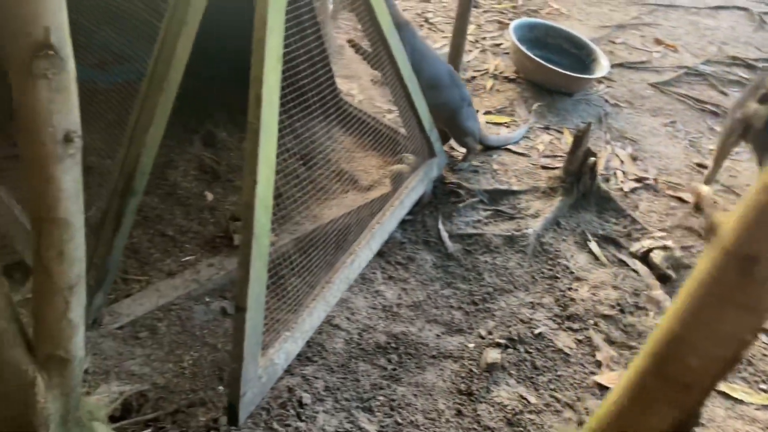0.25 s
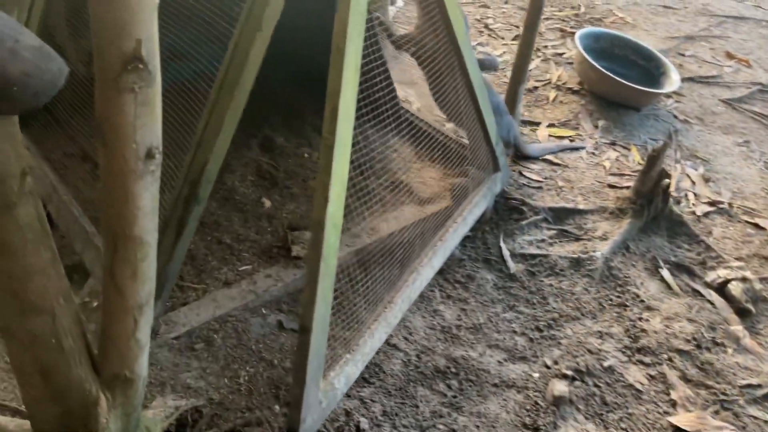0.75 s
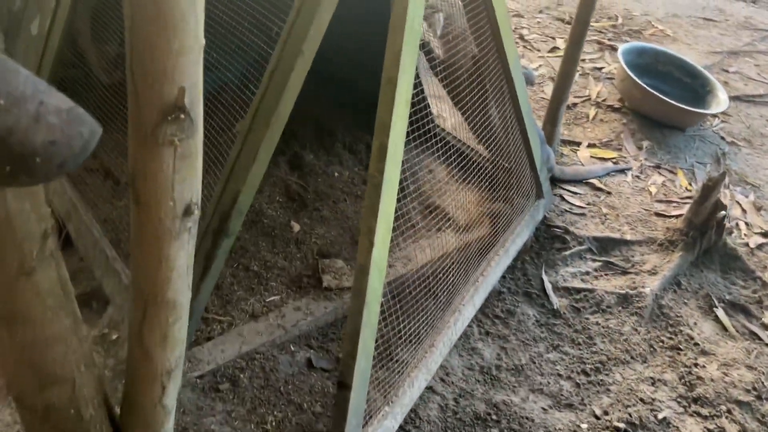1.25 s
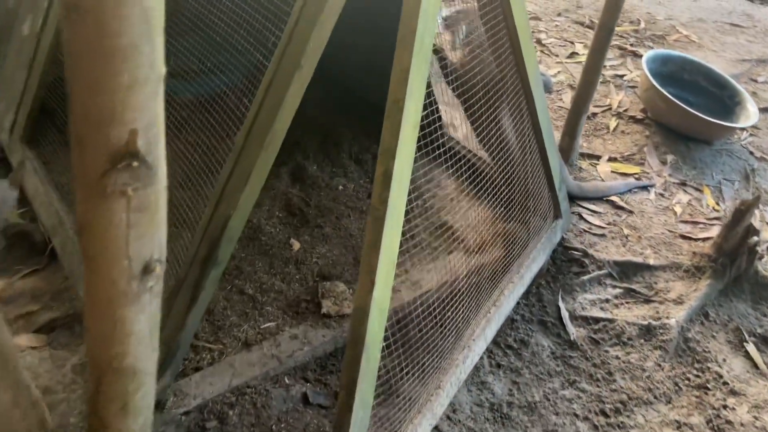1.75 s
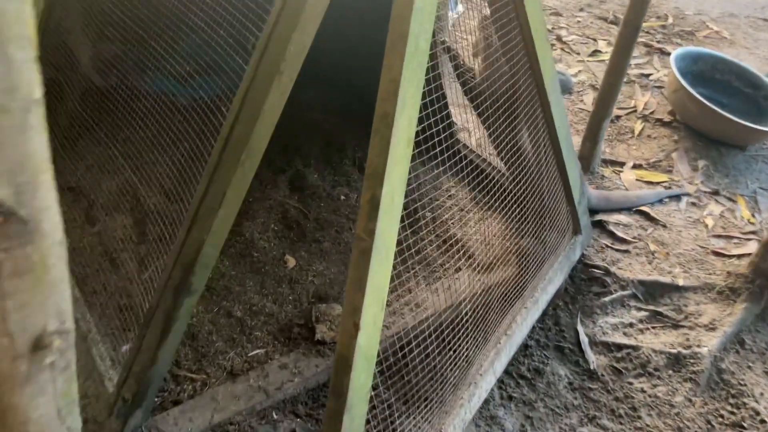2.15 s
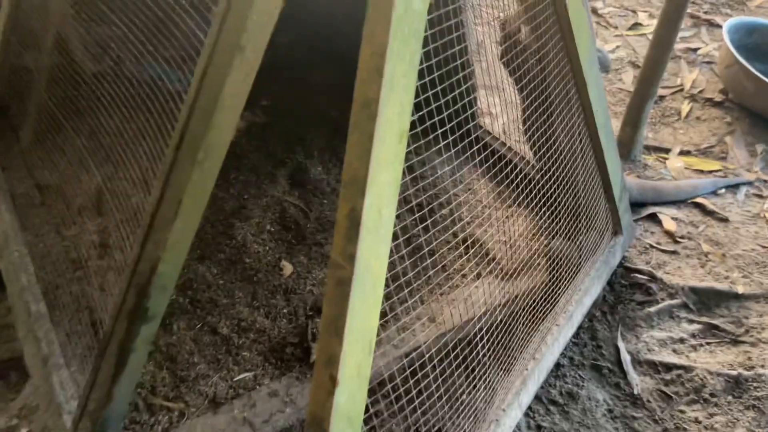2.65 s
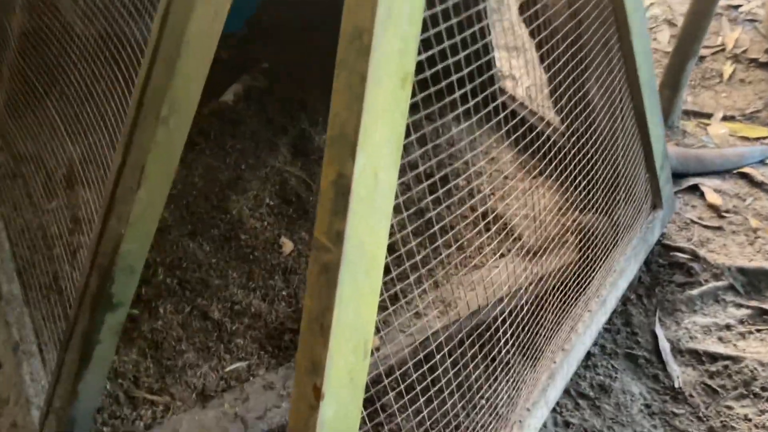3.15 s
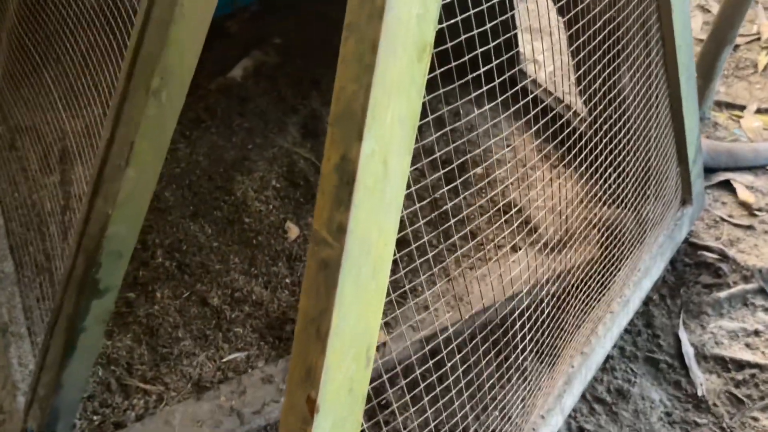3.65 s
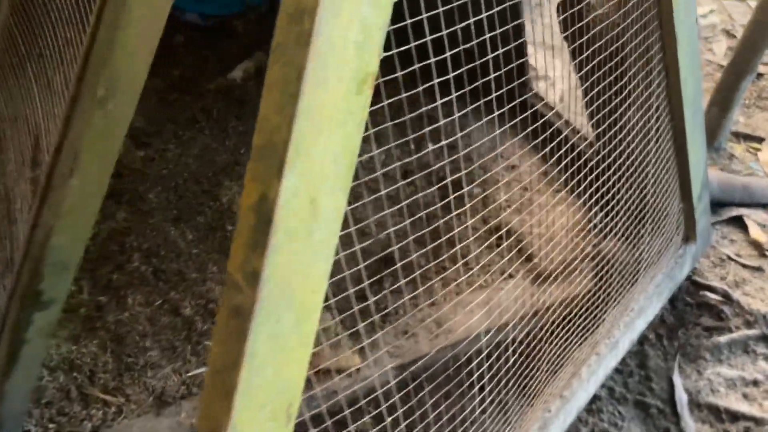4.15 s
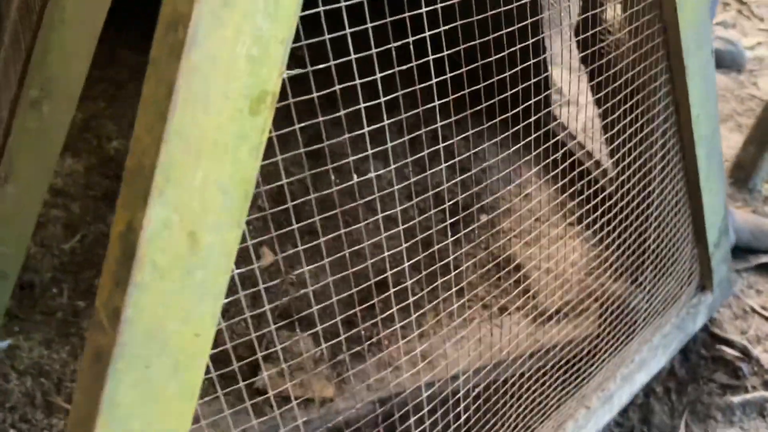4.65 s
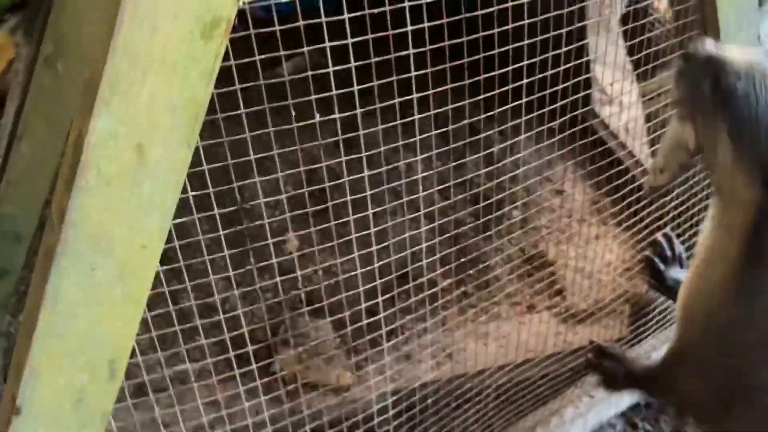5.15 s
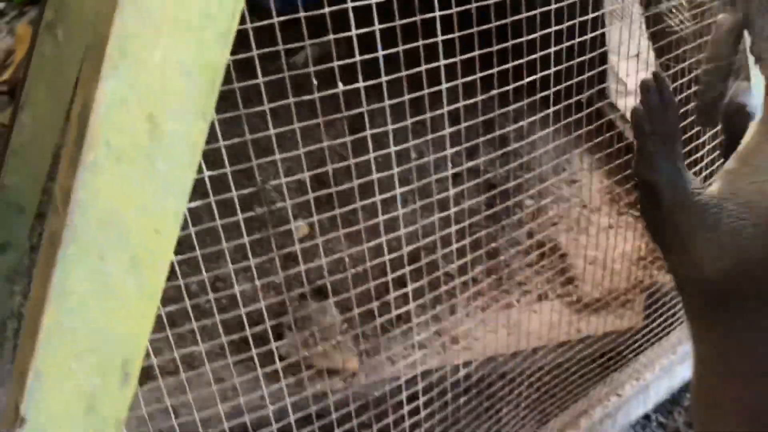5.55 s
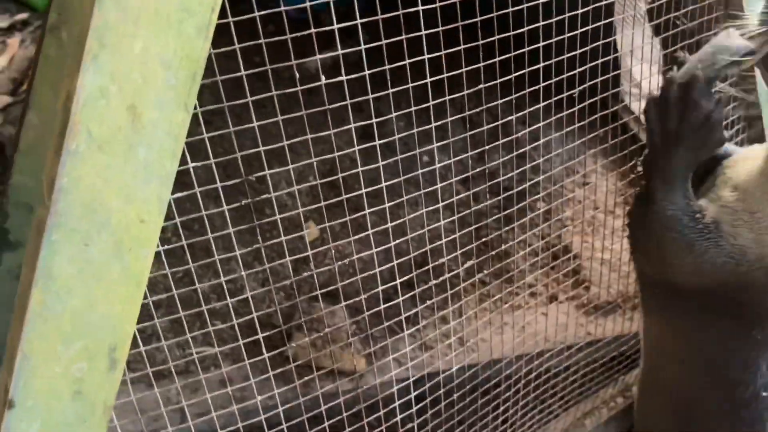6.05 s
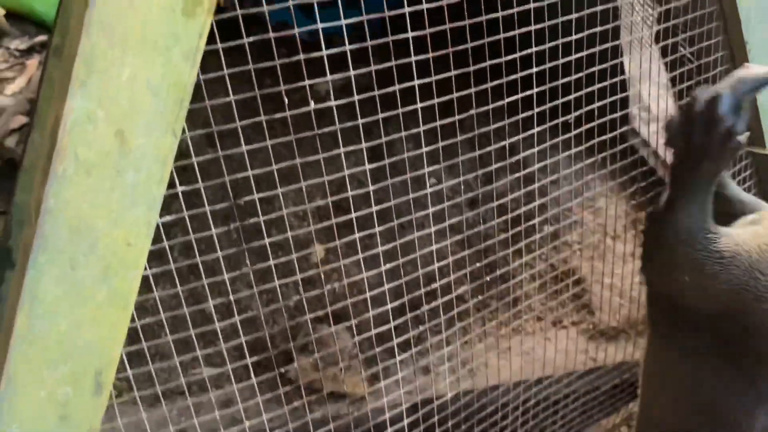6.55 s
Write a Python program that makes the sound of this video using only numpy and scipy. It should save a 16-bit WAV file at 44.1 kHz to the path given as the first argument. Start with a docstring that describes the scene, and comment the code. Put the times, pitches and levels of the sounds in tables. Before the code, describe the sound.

Close outdoor stereo at a wire pen, with short scattered echoes, soft low rumble, thin hiss and faint high insect pips throughout. From 0 to 1.1 s a nearby otter makes a breathy, rasping low call, gradually rising and clearing. It leaps into a bright squeak at 1.15 s, then short chirps at 1.4, 1.6 and 2.0 s, each flicking and dipping. A thin, steady whine from a second otter sits further left, about 1.8 to 2.7 s. At 2.3 s a chirp breaks into a hoarse warbling wail until 3.35 s. A brief squeak at 3.5 s leads to a longer, clearer squeal, 3.7 to 4.2 s, with light mesh ticks near 4.0 and 4.15 s. A rough call follows at 4.3 s, then squeaks at 4.8 and 5.1 s. Rumble swells around 5.25 s with another tick. A long falling, rasping squeal runs 5.5 to 6.5 s; a tick and short chirp end it near 6.7 s.

```python
"""A nearby otter chirps, squeaks and squeals beside a wire pen: a stack of partials and puffs of breath,
both shaped by throat and mouth, clear when high and rasping when low. A second otter whines further off
on three sine partials. Paws tick on the mesh as fading tones with noisy rattle, and an insect pips on
one pitch. Shaped noise makes a low rumble and a thin outdoor hiss, and noise echoes make the surroundings."""
import sys
import numpy as np
from scipy import signal
from scipy.fft import rfft, irfft
from scipy.io import wavfile
from scipy.ndimage import uniform_filter1d, map_coordinates

SR = 44100
rng = np.random.default_rng(int(sys.argv[2]) if len(sys.argv) > 2 else 0)


def store_wav(level_fs):
    """Save 16-bit WAV to argv[1]."""
    pcm = np.round(np.clip(np.atleast_2d(level_fs), -1, 1) * 32767)
    wavfile.write(sys.argv[1], SR, pcm.T.astype(np.int16))


def boost(x):
    """Linear amplitude factor 10**(x/20) for a level x in decibels (scalar or array-like)."""
    u = np.asarray(x, float) / 20
    return 10 ** u


N = 299880
T = np.arange(N) / SR   # time of each sample in s
HZ = np.arange(N // 2 + 1) * SR / N + 1e-3   # spectrum frequencies, just above 0 so that log works


def rms_one(x):
    """Scales a sound to an rms of 1."""
    return x / np.sqrt(np.mean(x ** 2) + 1e-20)


def at_hz(points, hz):
    """Reads a curve of (f/Hz, level/dB) along a logarithmic frequency axis."""
    table_hz, table_db = np.transpose(points)
    return np.interp(np.log(hz), np.log(table_hz), table_db)


def over_time(points):
    """Draws straight lines through (t/s, value) points, one value per sample."""
    return np.interp(T, *np.transpose(points))


def colour(x, gain):
    """Filters a sound by multiplying its spectrum by a gain."""
    return irfft(rfft(x) * gain, N)


def drift(rate_hz):
    """Slow chance: noise through a double one-pole low-pass, spread 1."""
    r = np.exp(-2 * np.pi * rate_hz / SR)
    noise = rng.standard_normal(N + SR)
    settled = signal.lfilter([1], [1, -2 * r, r * r], noise)[SR:]   # drop the filter's first second
    return rms_one(settled)


def joined(tables, column):
    """Joins the tables of several calls and draws lines through one column."""
    rows = np.concatenate(tables)
    return np.interp(T, rows[:, 0], rows[:, column])


def gate(tables, rise_s, fall_s):
    """1 while a call sounds, 0 outside, ramped at both ends."""
    total = 0
    for rows in tables:
        rise = (T - rows[0][0]) / rise_s
        fall = (rows[-1][0] - T) / fall_s
        total = total + np.clip(np.minimum(rise, fall), 0, 1)
    return total


def background(alike_hz=450, hiss_db=-46.5):
    """Rumble is shaped noise, more alike on both sides the lower it is; hiss is unrelated between sides."""
    # spectrum shape of the outdoor hiss: f/Hz, relative level/dB per Hz
    hiss_shape = [(180, -44), (300, 0), (1440, -2), (2200, 1), (3500, -11), (4700, 2), (6400, 1.5),
                  (7200, -5.5), (8800, -9), (10700, -6), (11700, -6), (13300, -74)]
    # spectrum shape of the rumble: f/Hz, relative level/dB per Hz
    rumble_shape = [(25, -17), (50, 6), (105, 5), (200, -6), (400, -19), (800, -69.5)]
    # loudness of the rumble, midway between the two sides: t/s, level/dB
    rumble_level = [(0.0, -44.5), (5.1, -46), (5.25, -37), (5.75, -39.5), (6.1, -45.5), (6.35, -40),
                    (6.55, -47.5)]
    common, own = rng.standard_normal(N), rng.standard_normal((2, N))
    alike = 1 / (1 + (HZ / alike_hz) ** 2)   # shared part of the power
    low = boost(at_hz(rumble_shape, HZ))
    rumble = rms_one(colour(common, low * np.sqrt(alike)) + colour(own, low * np.sqrt(1 - alike)))
    hiss = rms_one(colour(rng.standard_normal((2, N)), boost(at_hz(hiss_shape, HZ))))
    rumble_db = over_time(rumble_level) + [[.6], [-.6]]   # a little louder on the left
    return rumble * boost(rumble_db) + hiss * boost(hiss_db)


def surroundings(x, early_s, late_db, late_s):
    """Scatter from posts, mesh and ground: a dense early cluster and a fainter tail, other ones per side."""
    age = T[:SR // 2]
    shape = np.exp(-age / early_s) + boost(late_db) * np.exp(-age / late_s)
    echoes = rng.standard_normal((2, len(age))) * shape / np.sqrt(np.sum(shape ** 2))
    return signal.fftconvolve(x[None], echoes, axes=1)[:, :N]


def insect(pip_hz=6500, pip_db=-53, pips_per_s=12, peak_s=.003):
    """Short swelling and fading pips of one pitch that come in loose groups."""
    # twice the average rate, but only in the half of the time when the drift is positive
    begins = (rng.random(N) < 2 * pips_per_s / SR) * (drift(3.0) > 0)
    starts = begins * boost(2 * rng.standard_normal(N))   # strength varies from pip to pip
    age = T[:SR // 40]
    swell = age / peak_s * np.exp(1 - age / peak_s)
    pips = signal.fftconvolve(starts, swell)[:N]
    return boost(pip_db) * pips * np.sin(2 * np.pi * pip_hz * T)


def ticks(cycles=22.0, rattle_db=-9, rattle_s=0.0019):
    """Each touch rings the struck part briefly and shakes a burst of rattle from the mesh."""
    # paws on mesh and frame: t/s, starting level of the ring before the mix/dB, f of the ring/Hz
    touches = [(2.692, -25, 134.3), (4.039, -12, 2353), (4.147, -19, 2420), (5.28, -17, 2330),
               (6.659, -22, 1513)]
    out, mesh = np.zeros(N), rng.standard_normal(N)
    for s, db, hz in touches:
        age = np.maximum(T - s, 0)
        body = np.sin(2 * np.pi * hz * age) * boost(-60 * age * hz / cycles)   # down 60 dB after 22 cycles
        rattle = boost(rattle_db) * mesh * np.exp(-age / rattle_s) * min(hz / 1500, 1)
        out += boost(db) * (T >= s) * (body + rattle)
    return out


def far_otter():
    """A thin, nearly steady whine of three partials."""
    # one table per whine: t/s, middle pitch f/Hz, level before flutter and mix/dB
    whines = [
        [(1.82, 820, -53.5), (2.02, 818, -56.5)],
        [(2.03, 904, -59), (2.4, 858, -47.5), (2.7, 840, -100)],
    ]
    # lowest partial first: level/dB
    partials_db = [2, -3, -15]
    pitch = joined(whines, 1) * np.exp(0.011 * drift(62.0))
    phase = 2 * np.pi * np.cumsum(pitch) / SR
    tone = sum(boost(db) * np.sin((k + 1) * phase) for k, db in enumerate(partials_db))
    level = boost(joined(whines, 2) + 3 * drift(28))
    return tone * level * gate(whines, rise_s=0.027, fall_s=0.011)


def calls(flick_peak_s=0.027, flick_swell_db=4.5, flick_longest_s=.09):
    """Each call's table, headed by its flick: to the peak pitch while swelling, then on into the call."""
    # opening flicks: start t/s, start f/Hz, peak f/Hz, level below 4 kHz/dB, level above 4 kHz/dB;
    # both levels belong to the peak and come before flutter and mix
    flicks = [(1.153, 1577, 2053, -16, -30.5), (1.381, 1483, 1580, -26, -30),
              (1.628, 1290, 1331, -30, -30.5), (1.965, 1565, 1770, -28, -29.5),
              (2.273, 1267, 1241, -24.5, -32.5), (3.457, 1416, 1727, -28.5, -32.5),
              (3.673, 1514, 1807, -30, -26.5), (4.282, 1288, 1305, -34, -34.5),
              (4.811, 1234, 1453, -30, -31), (5.115, 1345, 1530, -29, -22.5),
              (5.485, 1442, 1550, -31, -28.5), (6.711, 1353, 1351, -31.5, -33)]
    # what follows, one table per call: t/s, middle pitch f/Hz, then the same two levels/dB
    bodies = [
        [(.025, 541, -31, -44), (.058, 524, -57, -49), (.082, 540, -41, -45), (.108, 521, -42, -37.5),
         (.135, 542, -44, -42), (.25, 557.2, -33.5, -40.5), (.5, 567.3, -29.5, -31.5), (.8, 591.7, -32, -28.5),
         (.92, 621.6, -30.5, -27.5), (1.015, 641.5, -27, -27), (1.066, 787, -32.5, -31)],
        [(1.217, 1340, -54, -38), (1.25, 1398, -27.5, -32.5), (1.295, 1029, -68, -45)],
        [(1.437, 1133, -46, -40.5), (1.47, 1216, -31.5, -29), (1.501, 1101, -31, -40)],
        [(1.692, 911, -30.5, -36), (1.724, 1202, -23.5, -29.5), (1.752, 1020, -40, -38),
         (1.78, 1192, -27, -30.5), (1.82, 1050, -31.5, -42), (1.866, 1272, -37, -34)],
        [(2.019, 1170, -38, -33.5), (2.058, 1325, -26, -21.5), (2.092, 1127, -35, -36.5),
         (2.127, 1260, -23, -23)],
        [(2.325, 1007, -24, -31), (2.375, 1270, -45, -36.5), (2.403, 1096, -30, -34), (2.45, 1170, -30.5, -34),
         (2.48, 1005, -29, -37), (2.484, 731, -37, -30), (2.6, 648.4, -32, -34), (2.85, 565.6, -33.5, -31),
         (3.07, 628, -29.5, -30), (3.095, 721, -31.5, -28.5), (3.356, 792.6, -34.5, -29)],
        [(3.516, 1303, -31, -29.5), (3.54, 1278, -40, -67)],
        [(3.732, 1210, -43, -41), (3.773, 1318, -33, -29), (3.835, 1098, -31.5, -34), (4.18, 1038, -31, -40)],
        [(4.334, 943, -33, -38), (4.382, 704, -34.5, -35.5), (4.46, 725, -31, -33), (4.65, 748.6, -31.5, -32),
         (4.691, 841, -34, -33)],
        [(4.873, 1140, -36.5, -32), (4.899, 1247, -24, -23), (4.933, 1038, -31, -33.5),
         (4.993, 1214, -28, -26.5)],
        [(5.168, 1041, -35, -40), (5.19, 1073, -29.5, -35), (5.23, 962, -32.5, -31.5),
         (5.292, 1163, -27.5, -51)],
        [(5.541, 1148, -32, -34), (5.7, 1102, -31.5, -35), (5.81, 862, -35, -31.5), (5.933, 646.7, -38, -37.5),
         (6.08, 694.4, -35.5, -35), (6.256, 776, -32, -28), (6.3, 732, -33, -35), (6.519, 793.6, -26.5, -27.5)],
        [(6.767, 950, -29.5, -43), (6.797, 884, -31, -34)],
    ]
    out = []
    for rows in bodies:
        head = []
        for s, hz, peak_hz, low_db, high_db in flicks:
            if 0 < rows[0][0] - s < flick_longest_s:   # this flick leads into this call
                head.append((s, hz, low_db - flick_swell_db, high_db - flick_swell_db))
                head.append((s + flick_peak_s, peak_hz, low_db, high_db))
        out.append(head + rows)
    return out


def unsteady_pitch(sung, rough, waver=.012, jitter=0.026, warble_hz=19):
    """The folds waver slowly, warble unevenly in the rasping calls and jitter when rough."""
    # largest warble: t/s, swing as natural log of the pitch ratio (+ jumps up, - dips down)
    warble_swing = [(.9, -.07), (1.0, 0), (2.5, 0), (2.6, .22), (3.05, .14), (3.1, 0), (4.35, 0),
                    (4.4, -.25), (4.66, -.25), (4.7, 0), (6.25, 0), (6.26, -.27), (6.45, -.27), (6.47, 0)]
    aim = uniform_filter1d(joined(sung, 1), size=220)
    beat = np.sin(2 * np.pi * np.cumsum(warble_hz * np.exp(.4 * drift(8))) / SR)
    warble_depth = np.minimum(np.abs(drift(10)) + .5, 1)
    warble = over_time(warble_swing) * (1 + beat) / 2 * warble_depth
    return aim * np.exp(waver * drift(14) + warble + rough * jitter * drift(243.0))


def clear_voice(pitch, phase, rough, split_hz, flicker_db=4, halving=1.8):
    """Partials through the throat, below and above the split; roughness weakens every second cycle."""
    # throat and mouth on the partials: f/Hz, relative level/dB
    throat = [(500, -3.5), (800, 12.5), (1100, -2.5), (1650, 11), (2150, 19.5), (2650, -1), (3050, -1.5),
              (3600, -8.5), (4300, -4.5), (5200, 5.5), (6000, 11.5), (7600, -8), (10600, -6.5),
              (13300, -23)]
    # lowest partial against the rest: t/s, added level/dB
    lowest_level = [(1.6, -8), (3.7, -17.5), (3.9, 11), (4.3, -9), (5.9, -7.5), (6.2, 2), (6.7, -14)]
    smooth_pitch = uniform_filter1d(pitch, size=200)
    tone, power = np.zeros((2, N)), np.full((2, N), 1e-9)
    lowest = boost(over_time(lowest_level))
    for k in range(1, 25):
        hz = k * smooth_pitch
        height = boost(at_hz(throat, hz) + flicker_db * drift(21.9)) * (hz < 13300)
        if k == 1:
            height = height * lowest
        upper = np.clip((hz - split_hz) / 400 + .5, 0, 1)
        share = np.sqrt([1 - upper, upper])
        tone += share * height * np.sin(k * phase + k * k)
        power += (share * height) ** 2 / 2
    now_and_then = np.maximum(drift(28), 0)
    depth = np.clip(halving * np.maximum(rough - .3, 0) * now_and_then, 0, 1)
    return tone * (1 + depth * np.cos(phase / 2)) / np.sqrt(power)


def breath(phase, rough, split_hz, pulsing=0.15, sizzle_hz=7500, sizzle_db=18):
    """Noise puffed once a cycle through the mouth, below and above the split."""
    # mouth on the rasp: f/Hz, relative level/dB
    mouth = [(500, -11), (1600, -19), (2100, -3), (2600, 1), (3300, -6.5), (4500, 4), (8000, 10.5),
             (9400, -1), (10500, 13.5), (13300, -20.5)]
    puffs = rng.standard_normal(N) * (1 + pulsing * np.cos(phase))
    shape = boost(at_hz(mouth, HZ))
    low = rms_one(colour(puffs, shape * (HZ < split_hz)))
    high = rms_one(colour(puffs, shape * (HZ >= split_hz)))
    sizzle = colour(high, HZ > sizzle_hz)   # the top of the breath grows with roughness, up to a limit
    high = high + sizzle * (boost(sizzle_db * np.minimum(rough - .42, .15)) - 1)
    return np.array([low, high])


def near_otter(split_hz=4000, low_rasp=0.38, high_rasp=1.87, flutter_db=3.5):
    """Vibrating folds give partials and puffs of breath; the rougher they run, the more breath is heard."""
    # how unsteadily the folds run: t/s, roughness (0 to 1)
    roughness = [(.15, 1), (.25, .5), (.8, .45), (.95, .3), (1.1, .18), (2.31, .2), (2.36, .6), (3.0, .55),
                 (3.16, .2), (4.2, .12), (4.38, .6), (4.7, .55), (4.8, .17), (5.8, .24), (5.86, .65),
                 (6.02, .35), (6.25, .28), (6.3, .45), (6.48, .3)]
    sung = calls()
    rough = np.clip(over_time(roughness), 0, 1)
    pitch = unsteady_pitch(sung, rough)
    phase = 2 * np.pi * np.cumsum(pitch) / SR
    tone = clear_voice(pitch, phase, rough, split_hz)
    rasp = breath(phase, rough, split_hz)
    noisy = np.clip(rough * [[low_rasp], [high_rasp]], 0, 1)
    voice = np.sqrt(1 - noisy ** 2) * tone + noisy * rasp
    level_db = np.array([joined(sung, 2), joined(sung, 3)])
    level = boost(level_db + flutter_db * rough * drift(74))
    return (voice * level).sum(axis=0) * gate(sung, rise_s=0.01, fall_s=0.009)


def right_side(near, sway_s=.00003):
    """Near sounds reach the right microphone later and changed in tone; the path wavers as the head turns."""
    # right microphone against left: f/Hz, level/dB
    shadow = [(300, -5), (700, -33), (1200, -21.5), (2300, 6.5), (3200, 0.5), (5300, -4), (8000, -1)]
    # extra path to the right as the otter moves, before the sway: t/s, delay/s
    lag = [(0, 0.0002), (6.8, 0.00026)]
    heard_at = T - over_time(lag) - sway_s * drift(1.83)
    lagged = map_coordinates(near, [heard_at * SR], order=3)
    return colour(lagged, boost(at_hz(shadow, HZ)))


def scene():
    """Mixes both otters, paws, insect, echoes and background for the left and right sides."""
    near = near_otter() + ticks()
    far = far_otter()
    room = boost(-9.5) * surroundings(near + 2 * far, early_s=0.011, late_db=-19.5, late_s=0.068)
    near_sides = boost(-2.5) * np.array([near, right_side(near)])
    far_sides = far * boost(np.array([[3], [-3]]))   # further to the left
    return near_sides + far_sides + room + background() + insect()


def low_pass(x):
    """Removes everything above the highest recorded frequency."""
    return signal.sosfilt(signal.butter(12, 13560, fs=SR, output="sos"), x)


def record(dry):
    """Above the first turn point the right channel is the left one with its phase turned."""
    # phase turn of the shared top octave: f/Hz, angle/radians
    top_turn = [(8600, 0), (10100, np.pi), (12000, 2.15 * np.pi)]
    left, right = rfft(dry)
    turn_hz, turn = np.transpose(top_turn)
    top = np.clip((HZ - turn_hz[0]) / 400 + 1, 0, 1)   # fades over during the 400 Hz below that point
    turned = left * np.exp(1j * np.interp(HZ, turn_hz, turn))
    right = (1 - top) * right + top * turned
    mix = irfft(np.array([left, right]), N)
    return low_pass(mix)


dry = scene()
out = record(dry)
store_wav(out)
```